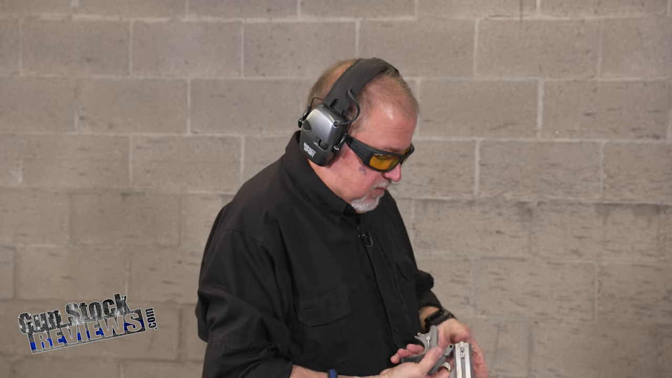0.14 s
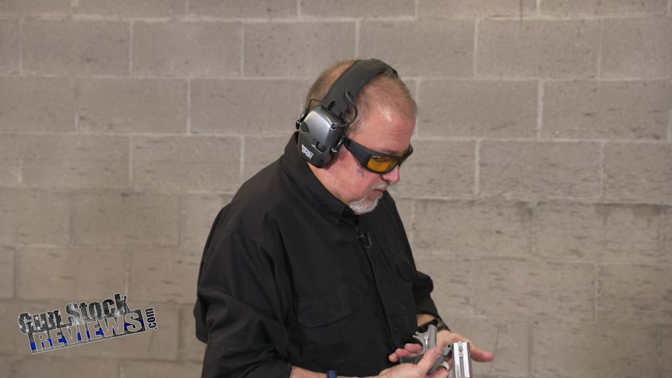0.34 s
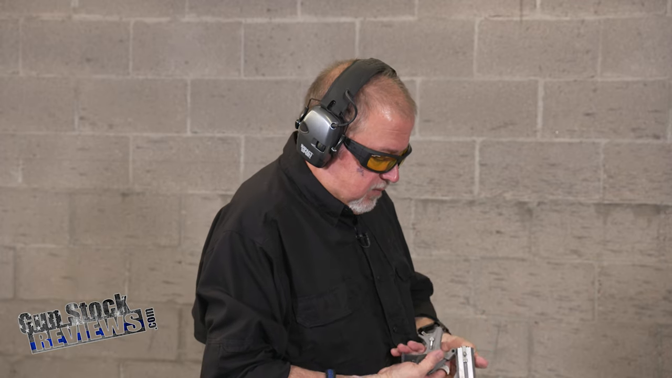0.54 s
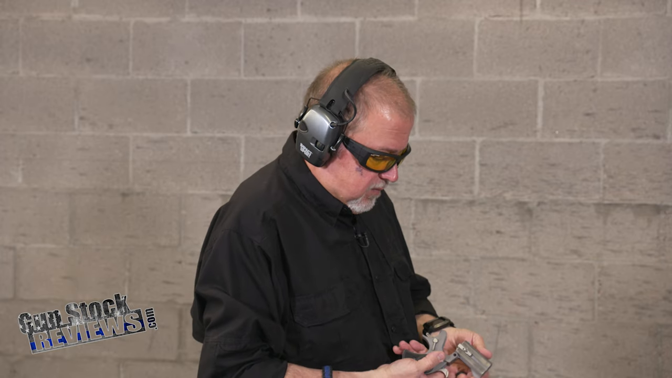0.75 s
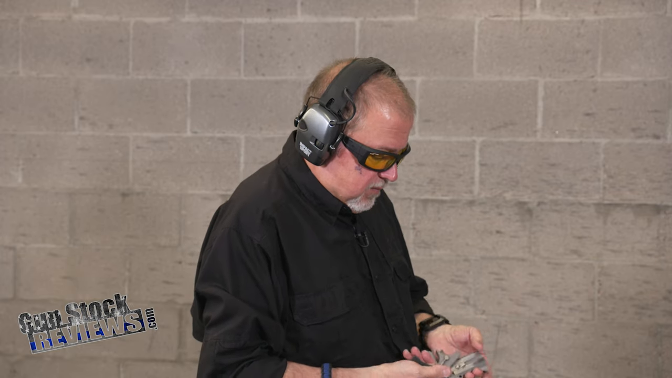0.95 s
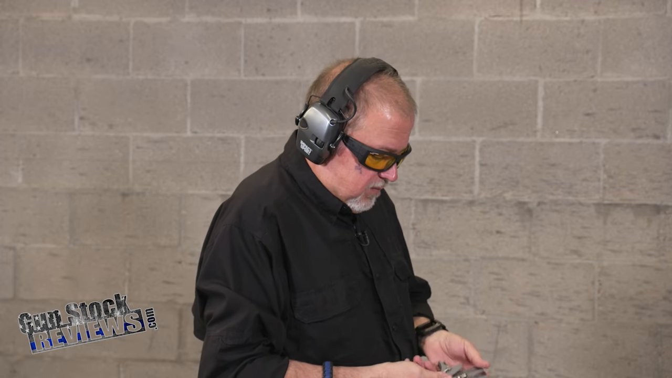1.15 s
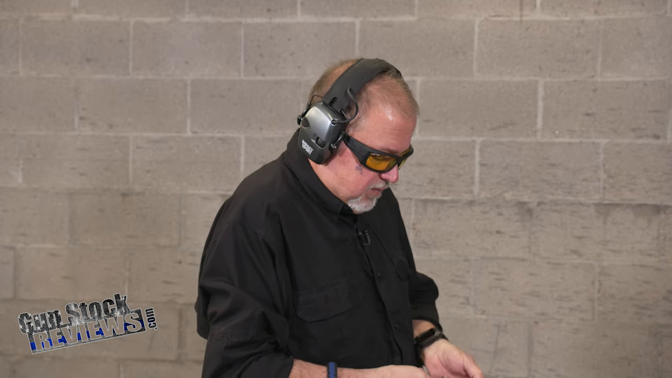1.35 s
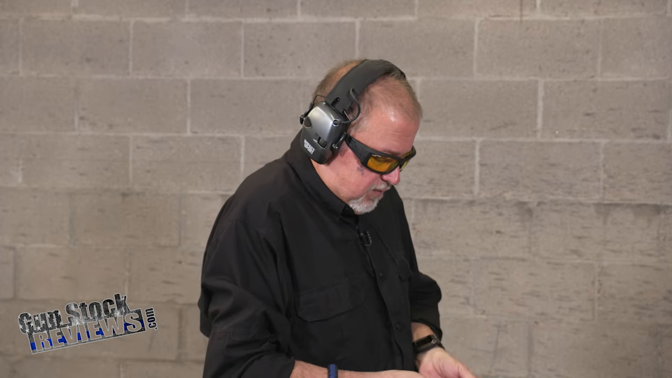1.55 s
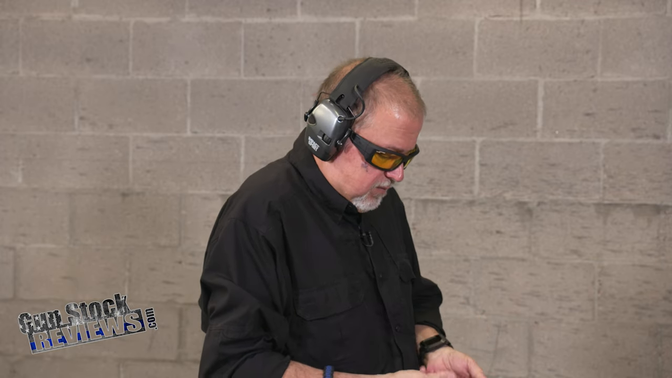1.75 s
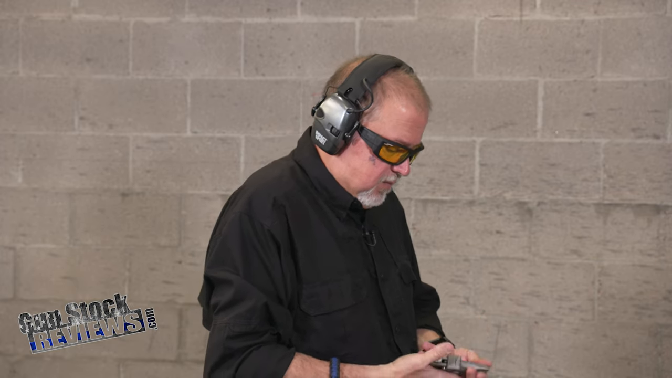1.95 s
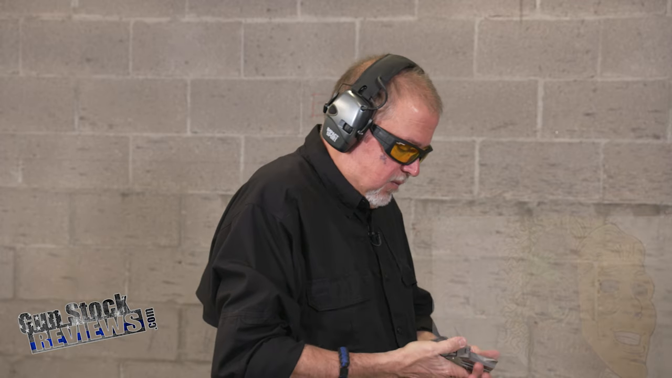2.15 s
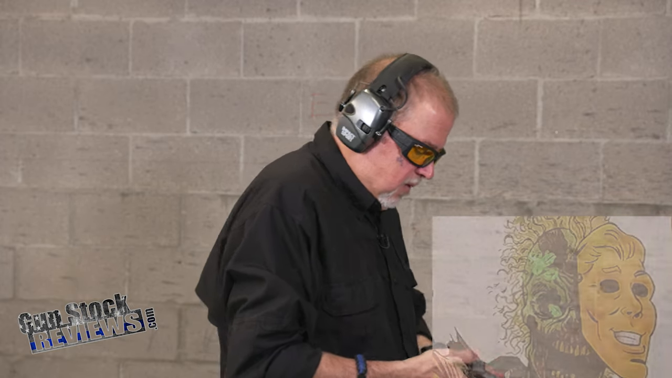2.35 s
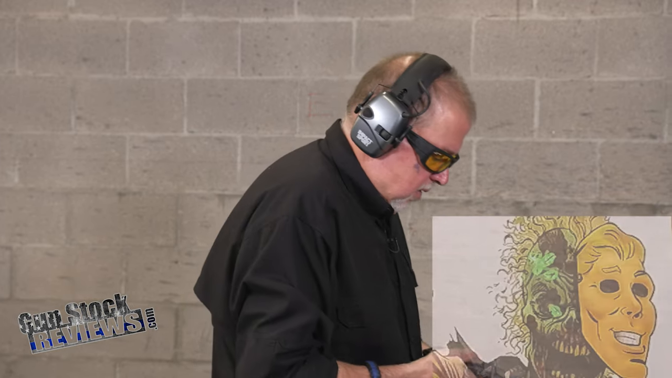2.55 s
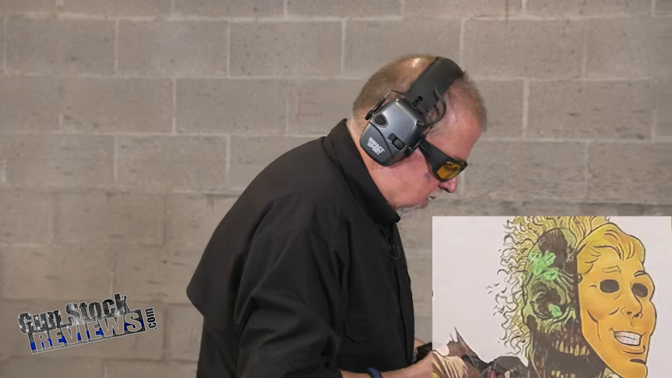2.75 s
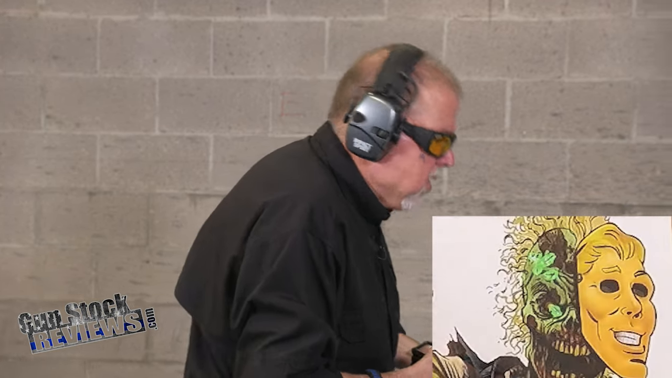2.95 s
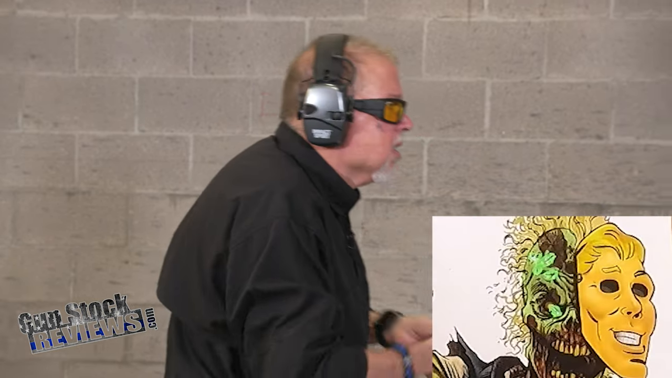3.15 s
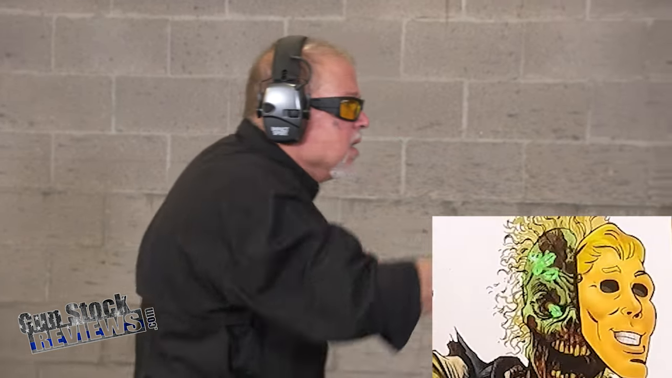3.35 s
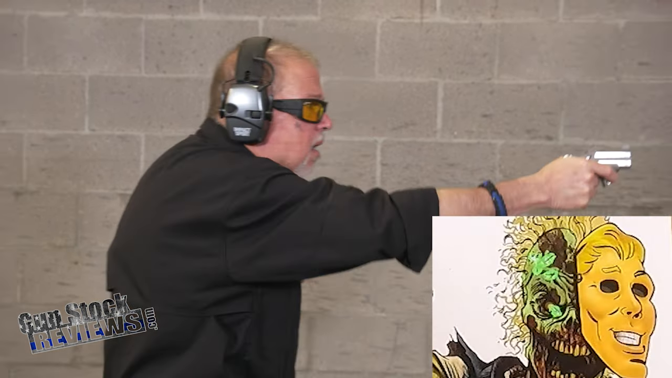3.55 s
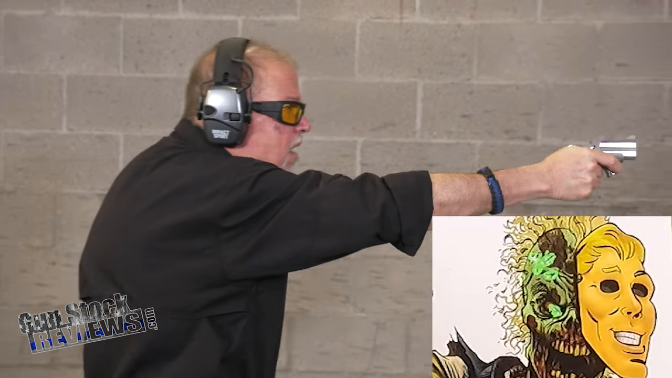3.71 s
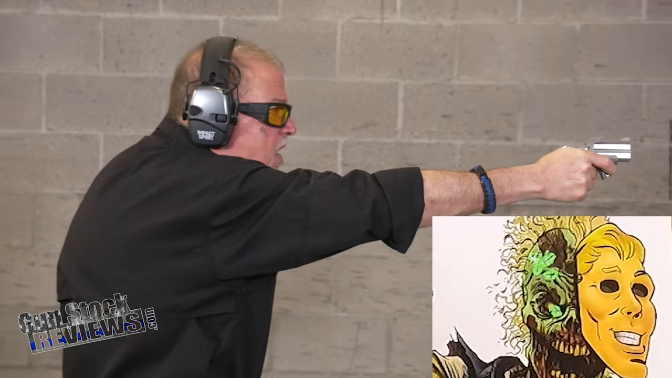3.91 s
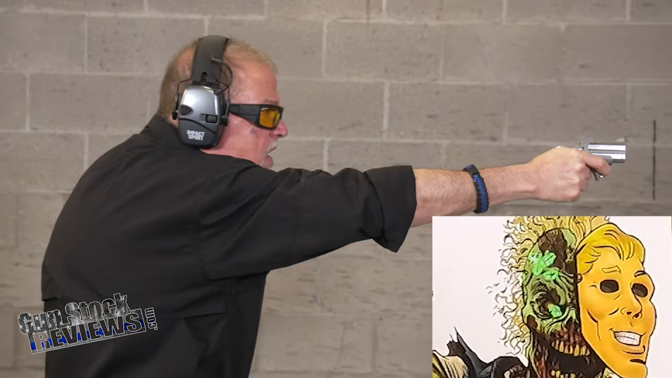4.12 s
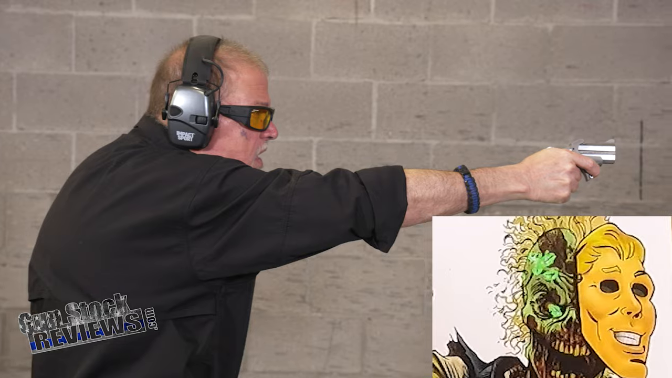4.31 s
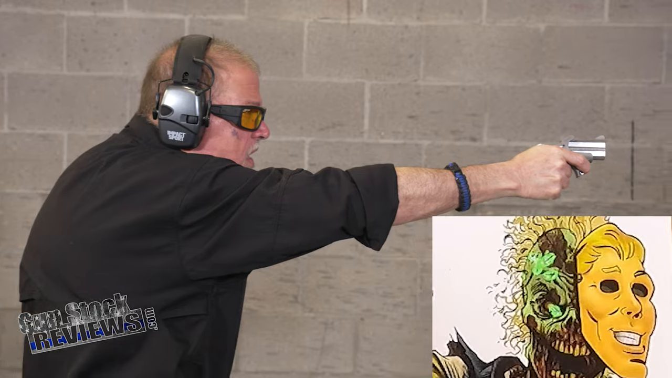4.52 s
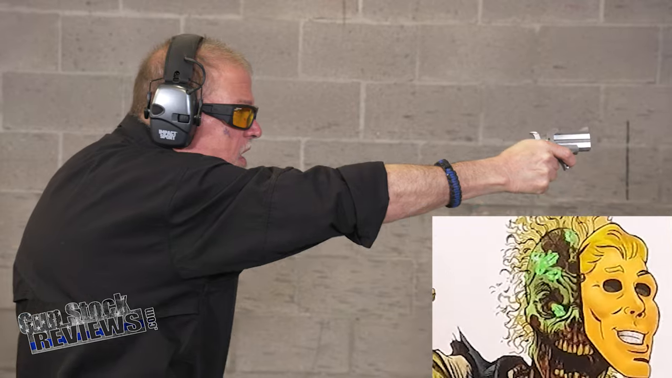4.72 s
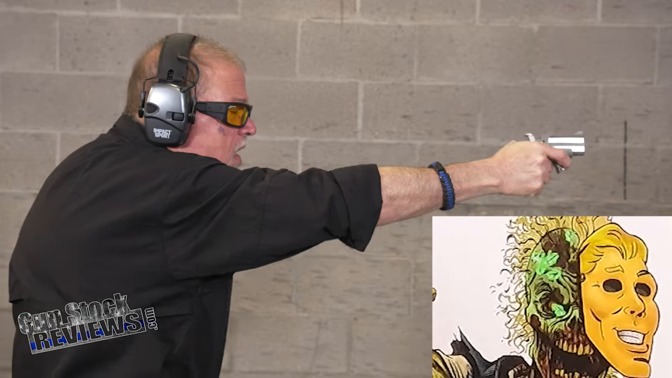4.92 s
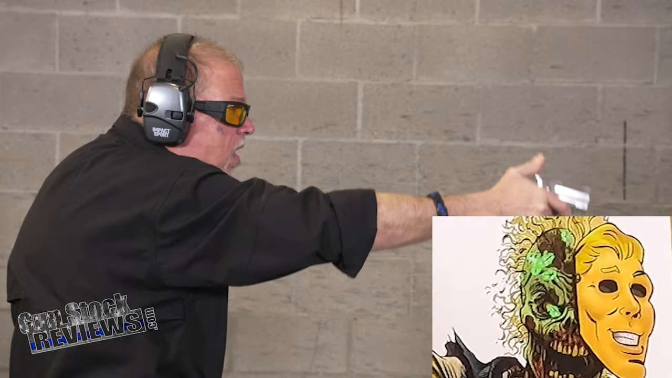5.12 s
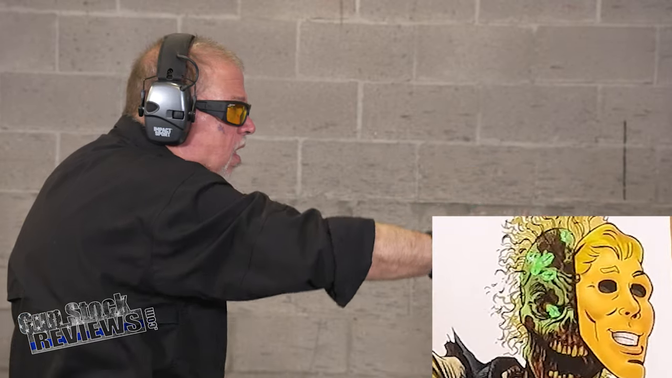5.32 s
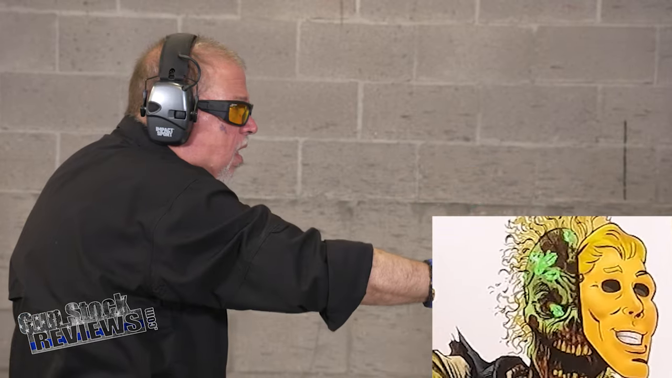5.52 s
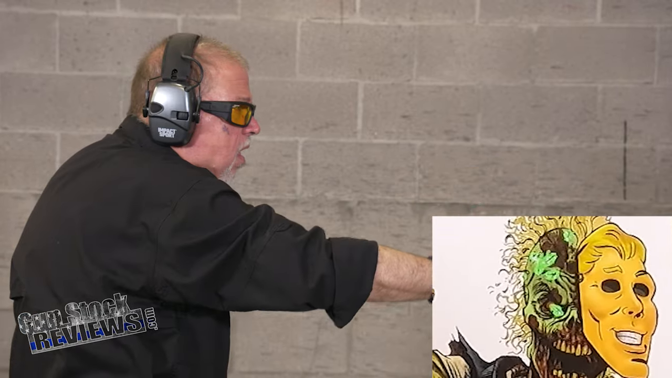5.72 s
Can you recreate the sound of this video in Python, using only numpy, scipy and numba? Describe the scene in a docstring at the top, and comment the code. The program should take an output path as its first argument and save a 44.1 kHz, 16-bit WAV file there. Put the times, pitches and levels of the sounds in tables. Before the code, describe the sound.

Metal clicks of a small pistol being handled over soft ventilation, then one overloaded gunshot that booms, rings and fades in a hard-walled indoor range.

```python
"""Ventilation and rustling sleeves are heard first, in a block-walled indoor range.
A small steel pistol is opened, loaded, closed and cocked: contact noise excites its steel modes.
It fires once, a burst of noise whose echo decays band by band; the blast overloads the microphone
input and a limiter holds the echo flat until it has decayed enough. The hard side walls then sing
their flutter modes, a comb of decaying sines, and the pistol is cocked again.
"""
import sys
import numpy as np
from scipy import signal
from scipy.fft import rfft, irfft, next_fast_len
from scipy.io import wavfile
from scipy.ndimage import uniform_filter1d, map_coordinates
from numba import njit

SR = 44100
rng = np.random.default_rng(int(sys.argv[2]) if len(sys.argv) > 2 else 0)


def master(y):
    """Save y as 16-bit WAV."""
    cut = np.clip(np.atleast_2d(y).T, -1, 1)
    pcm = np.round(cut * 32767)  # scale
    wavfile.write(sys.argv[1], SR, pcm.astype(np.int16))


N = 254456  # length [samples]

# Ventilation spectrum: (frequency [Hz], density [dB per Hz, relative])
AIR_SPECTRUM = [(12, -48), (20, -21.5), (37, 1.5), (70, -4), (106, 1.5), (207, -11.5), (362, -8.5),
                (549, -14.5), (597, -12.5), (705, -16), (1100, -16.5), (3000, -23), (4810, -31.5),
                (14300, -54), (15500, -62.5)]
# Cloth and skin rubbing; rise and fall each span 20 dB:
# (time of the loudest moment [s], peak level [dB], rise [s], fall [s])
RUBS = [(.075, -65.5, 0.026, .03), (.494, -69.5, 0.024, .09), (.926, -73, 0.3, 0.22),
        (1.09, -67, .08, 0.16), (1.294, -59.5, 0.023, 0.061), (1.45, -68, 0.35, 0.74),
        (1.905, -64.5, 0.14, 0.16), (2.442, -76.5, 0.027, 0.19), (2.56, -67.5, .04, .12),
        (3.07, -73, .18, 0.088), (3.52, -66, 0.54, 0.33), (3.63, -64, 0.057, 0.28), (4.3, -81.5, 0.32, .1)]
# Cloth spectrum: (frequency [Hz], density [dB per Hz, relative])
CLOTH_SPECTRUM = [(880, -39), (1500, -5.5), (2590, -1.5), (6630, -5.5), (9280, -15.5), (14600, -19.5),
                  (16000, -30.5)]
# Metal contacts: (time [s], level [dB], main ring [Hz], level of the other modes [dB])
CONTACTS = [(0.0781, -43.5, 5400, 2), (1.0371, -24, 4720, -1), (1.0396, -22, 5000, -8),
            (1.0481, -36, 4700, 11), (1.073, -42, 5200, 20.5), (1.3178, -30, 5400, 8),
            (1.3215, -19, 5480, 2.5), (1.3229, -18, 4260, -7), (1.3284, -21, 5050, -26),
            (1.4721, -38, 5420, -3), (1.4756, -15.5, 5300, -1.5), (1.4763, -17, 5130, -3),
            (1.4781, -13.5, 5100, -12), (1.482, -26, 4700, -10), (2.6482, -36, 5980, 4),
            (2.6505, -24, 4760, 5), (2.6516, -12.5, 4950, -3), (2.6531, -17, 6300, -1),
            (2.661, -38.5, 5000, 6), (2.666, -35, 5000, -18), (2.8374, -49, 4800, -7),
            (2.8451, -15, 5350, -2.5), (2.8534, -42.5, 4810, -7), (2.9935, -59.5, 4710, 5),
            (3.018, -61, 4740, 3), (3.037, -60, 4810, 1), (3.0659, -52, 4550, -6), (3.08, -61, 4820, 0),
            (3.097, -58, 4670, -1), (4.6632, -19.5, 4430, 0), (4.6673, -8.5, 5200, -1.5),
            (5.6145, -50, 5200, 0), (5.628, -43, 4560, 10), (5.6304, -12, 4940, -8), (5.6332, -22, 5460, 4),
            (5.6386, -29, 5300, 15), (5.651, -34, 4900, -10), (5.662, -33, 4800, 0)]
# Modes of grip, frame and barrel: (frequency [Hz], width [Hz], relative level [dB])
STEEL_MODES = [(215.2, 690, 2), (903, 200, 1), (2510, 650, 4.5), (4120, 340, -1), (6140, 660, -10.5),
               (8470, 730, -4.5), (10210, 780, -2), (11980, 670, -6), (13530, 400, -4), (14300, 280, -4.5)]
# Each step of handling strikes the pistol in its own place; levels are relative:
# (start [s], thud [dB], knock [dB], 2.5 kHz [dB], 9 kHz [dB], 14 kHz [dB], booth [dB],
#  hum [dB], hum frequency [Hz], main ring width [Hz])
HANDLING_STEPS = [(0, -34, -20, -21, -10, -42, -20, -45, 5500, 400),
                  (1.0, -25, -26, -21, -40, -37, -20, -42, 4700, 396),
                  (1.28, -36, -34, -30, -7.5, -7.5, -19, -46.5, 13500, 500),
                  (1.43, -13.5, -15, -5.5, 4.5, -1, -16, -42, 4750, 600),
                  (2.6, -19, -13, -14, 5.5, -6, -18, -46, 4800, 703),
                  (2.8, -17.5, -12, -33, 4.5, -26, -20, -47, 5600, 1270),
                  (2.95, -15, -20, -7, -1, -7, -14, -45.5, 4750, 400),
                  (4.6, -11.5, -10.5, -12, -13.5, -17, -13.5, -41, 4720, 400),
                  (5.58, -36, -38, -21.5, -22, -18, -11, -29.5, 4766, 700)]
# Booth echo of small sounds: (frequency [Hz], t60 [s], relative level [dB])
BOOTH = [(500, 0.25, -3.5), (2500, 0.2, -1.5), (3986, 0.34, -1), (6170, 0.32, -1.5), (8700, .3, -8.5),
         (16000, 0.15, -8)]
# Spectrum of the blast's echo: (frequency [Hz], density [dB per Hz, relative])
BLAST_SPECTRUM = [(35, -67), (60, -42), (101, -23.5), (208, -6), (252, -3.5), (358, -5.5), (629, -1.5),
                  (1500, 0.5), (6920, -16.5), (14700, -40), (16500, -59)]
# The long hall keeps feeding sound back before it fades: (frequency [Hz], hold [s], t60 [s])
HALL_DECAY = [(100, 0.51, 0.94), (306, 0.19, 0.92), (1022, 0.16, 0.97), (2380, 0.19, 0.85),
              (4900, 0.25, 0.58), (10000, 0.13, 0.43), (16100, 0.07, 0.53)]
# Standing waves between the side walls, 0.7 s after the shot: (frequency [Hz], level [dB], t60 [s])
FLUTTER_DECAY = [(121.3, -60.5, 0.89), (159, -57, 1.6), (300, -57.5, 1.52), (600, -60, 1.44),
                 (1050, -53.5, 1.56), (1550, -61.5, 1.92), (2120, -65.5, 1.35), (2780, -81.5, 1.1),
                 (4060, -85, 0.82)]
# The clearest flutter modes: (order, level above its neighbours [dB])
CLEAR_MODES = [(4, 1), (6, 9), (7, 14.5), (9, 5.5), (10, 15.5), (15, 10), (16, 5), (19, 4.5), (20, -0.5),
               (22, 7.5), (25, 7.5), (28, 3.5), (29, 4.5), (31, 5.5), (32, 4.5), (35, 1.5), (38, 5.5),
               (39, 7), (41, 8.5), (45, 5.5), (46, 8.5), (48, 9.5), (49, 4), (51, -3), (55, 4), (57, 5),
               (58, 7.5), (61, 7), (74, 7), (77, 10)]

AIR_DB = -57.5
CONTACT_S = 0.00083  # time scale of a contact's rattle
SHOT_S = 4.6676
WALLS_HZ = 30.96  # sound speed over twice the hall's width
PLACE = 0.312  # shooter's place across the hall, share of its width
TOP_HZ, EDGE_HZ = 16900, 900  # band limit and the width of its slope


def amp(db):
    """Decibel definition: amplitude ratio from a level."""
    return 10 ** (np.asarray(db) / 20)


def unit(x):
    """Normalization to unit root-mean-square."""
    return x / np.sqrt(np.mean(x ** 2) + 1e-20)


def along(points, hz, column=1):
    """Interpolation of one table column on a logarithmic frequency axis."""
    table = np.transpose(points)
    return np.interp(np.log(hz + 1), np.log(table[0] + 1), table[column])


def filtered(x, response):
    """Linear filtering: the spectrum of x times a response of frequency."""
    size = next_fast_len(len(x) + 8192)
    spectrum = rfft(x, size) * response(np.fft.rfftfreq(size, 1 / SR))
    return irfft(spectrum, size)[:len(x)]


def resonance(f, hz, width_hz):
    """Damped harmonic oscillator: a response of unit height at hz."""
    return 1j * f * width_hz / (hz * hz - f * f + 1j * f * width_hz)


def fading(size, db_at):
    """Diffuse decay: noise whose level in dB is a function of frequency and time."""
    hz, t, bins = signal.stft(rng.standard_normal(size), SR, nperseg=256)
    return signal.istft(bins * amp(db_at(hz[:, None], t)), SR, nperseg=256)[1][:size]


def add(track, s, x):
    """Superposition: x joins the track at time s and stops at the track's end."""
    start = round(s * SR)
    track[start:start + len(x)] += x[:N - start]


def ventilation(patchy_db=0.6):
    """Broadband flow noise: a steady, spectrally shaped rush with slight patches."""
    field = rng.standard_normal((129, N // 128 + 2))  # frequency by time
    field = uniform_filter1d(uniform_filter1d(field, size=3, axis=0), size=30, axis=1)
    rush = fading(N, lambda f, time: patchy_db * unit(field)[:, :len(time)])
    return amp(AIR_DB) * unit(filtered(rush, lambda f: amp(along(AIR_SPECTRUM, f))))


def rustle(grain_db=2.5):
    """Friction noise: cloth rubs in small uneven grains; each rub swells and dies away."""
    t = np.arange(N) / SR
    level = sum(amp(db - 20 * np.maximum((s - t) / rise_s, (t - s) / fall_s))
                for s, db, rise_s, fall_s in RUBS)
    knots = rng.standard_normal(N // 100 + 4)  # one every 100 samples
    grain = amp(grain_db * map_coordinates(knots, [np.arange(N) / 100]))
    rubbing = grain * rng.standard_normal(N)
    return level * unit(filtered(rubbing, lambda f: amp(along(CLOTH_SPECTRUM, f))))


def clicks(push=0.77, skirt_db=-14, after_t60=0.28, spread=2.5):
    """Modal excitation: a short rattle of contact rings the steel; a part hums on, the booth answers."""
    out, t = np.zeros(N), np.arange(SR // 3) / SR
    for s, db, hz, other_db in CONTACTS:
        step = [step for step in HANDLING_STEPS if step[0] <= s][-1]
        _, thud_db, knock_db, low_db, high_db, top_db, booth_db, hum_db, hum_hz, ring_width_hz = step
        u = t[:1500] / CONTACT_S
        rattle = (push + rng.standard_normal(len(u))) * np.sqrt(u) * np.exp(-1.6 * u)

        # the place of the strike colours the modes around the main ring and its broad skirt
        tone = [(250, thud_db), (870, knock_db), (2440, low_db), (9000, high_db), (14000, top_db)]
        modes = [(hz, ring_width_hz, 0), (hz, 3000, skirt_db)]
        modes += [(c, w, g + other_db + along(tone, c)) for c, w, g in STEEL_MODES]
        rings = [(g, filtered(rattle, lambda f: resonance(f, c, w))) for c, w, g in modes]
        # neighbouring modes alternate in sign
        hit = sum((-1) ** k * amp(g) * ring / np.abs(ring).max() for k, (g, ring) in enumerate(rings))

        noise = rng.standard_normal(len(t))
        hum = unit(filtered(noise, lambda f: resonance(f, hum_hz, 0.05 * hum_hz) ** 2))
        hum = amp(hum_db - 60 * t / after_t60) * hum

        echo = fading(len(t), lambda f, time: along(BOOTH, f, column=2) - 60 * time / along(BOOTH, f))
        echo = echo * (1 - np.exp(-t / 0.002))
        # heard from every side at once, the modes blur into broad colour
        blur = lambda f: np.sqrt(sum(np.abs(amp(g) * resonance(f, c, spread * w)) ** 2
                                     for c, w, g in modes))
        wet = filtered(echo, blur)
        wet = wet * np.linalg.norm(hit) / np.linalg.norm(wet)  # equal energy
        add(out, s, amp(db) * hit)
        add(out, s, amp(db) * (hum + amp(booth_db) * wet))
    return out


def flutter(t, scatter_db=3, drift=1, beat_db=3.5):
    """Standing waves between parallel walls: a comb of lines, weak where the shooter is near a node."""
    order = np.arange(4, 130)
    hz = order * WALLS_HZ
    coupling = np.cos(np.pi * order * PLACE) ** 2 + 0.12  # never quite silent at a node
    above = 20 * np.log10(coupling) + 3 + rng.normal(0, scatter_db, len(order))
    for k, db in CLEAR_MODES:
        above[order == round(k)] = db

    # the frequencies wander, higher lines more; phase is the running sum, 100 steps a second
    wander = uniform_filter1d(rng.standard_normal((len(order), len(t) // 441 + 1)), size=10, axis=1)
    slip = np.cumsum(drift * 3 * (1 + hz[:, None] / 700) * wander, axis=1) / 100
    slip = np.repeat(slip, 441, axis=1)[:, :len(t)]
    phase = hz[:, None] * t + uniform_filter1d(slip, size=441, axis=1) + rng.random((len(order), 1))

    t60 = along(FLUTTER_DECAY, hz, column=2) * np.exp(rng.normal(0, 0.2, len(order)) * (hz > 500))
    db = (along(FLUTTER_DECAY, hz) + above)[:, None] - 60 * (t - 0.7) / t60[:, None]
    # upper lines beat, 1 to 4 times a second
    beat_hz = rng.uniform(1, 4, (len(order), 1))
    beat = np.sin(2 * np.pi * (beat_hz * t + rng.random((len(order), 1))))
    db = db + beat_db * beat * (hz > 500)[:, None]
    onset = 1 / (1 + np.exp(-(t - 0.2) / 0.017))
    return (amp(db) * np.sin(2 * np.pi * phase)).sum(axis=0) * onset


def shot(echo_db=-16, blast_db=35, knee_s=0.06, linger_db=-22):
    """Reverberant decay: a muzzle blast, then a dense echo that holds and fades band by band to flutter."""
    out, t = np.zeros(N), np.arange(round(1.11 * SR)) / SR
    # time since the end of the hold, with a soft knee
    late = lambda f, time: knee_s * np.logaddexp(0, (time - along(HALL_DECAY, f)) / knee_s)
    fade = lambda f, time: 60 * late(f, time) / along(HALL_DECAY, f, column=2)
    # a weaker part of the echo lingers twice as long; the powers add
    both = lambda f, time: 10 * np.log10(amp(-2 * fade(f, time)) + amp(2 * linger_db - fade(f, time)))
    echo = fading(len(t), lambda f, time: along(BLAST_SPECTRUM, f) + both(f, time))
    echo = echo / np.std(echo[:SR // 10])
    echo = echo * np.minimum(t / 0.003, 1) ** 3
    first = amp(blast_db - 60 * t / 0.034)  # direct blast and the nearest walls
    backstop = amp(5 * np.exp(-((t - 0.27) / 0.05) ** 2))  # the far end sends a swell back
    add(out, SHOT_S, amp(echo_db) * (backstop + first) * echo + flutter(t))
    return out


def scene():
    """Superposition of the background, the handling and the shot."""
    return (ventilation() + rustle() + clicks() + shot())[None]


@njit
def follow(level, attack, release):
    """First-order smoothing with separate rates for rising and falling levels."""
    out, y = np.empty_like(level), 0.
    for n in range(len(level)):
        y += (level[n] - y) * (attack if level[n] > y else release)
        out[n] = y
    return out


def record(dry, limit_db=-19, attack_s=0.048, release_s=0.027, lag_s=0.002):
    """Saturation, gain control and band limiting: the input clips, then a limiter turns down what stays loud."""
    top = amp(-6)
    x = dry[0] / (1 + np.abs(dry[0] / top) ** 6) ** (1 / 6)
    power = follow(x ** 2, 1 / (attack_s * SR), 1 / (release_s * SR))
    loud = np.sqrt(follow(power, 1 / (lag_s * SR), 1 / (lag_s * SR)))  # the gain cell answers late
    x = x / (1 + (loud / amp(limit_db)) ** 4) ** (1 / 4)
    low_cut = lambda f: (1j * f / (55 + 1j * f)) ** 3
    high_cut = lambda f: np.clip((TOP_HZ - f) / EDGE_HZ, 0, 1) ** 2
    return filtered(x, lambda f: low_cut(f) * high_cut(f))[None]


dry = scene()
out = record(dry)
master(out)
```